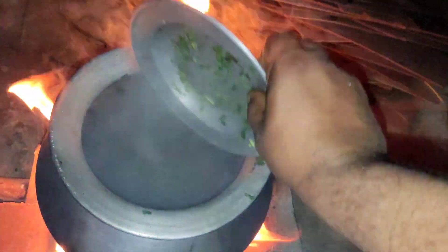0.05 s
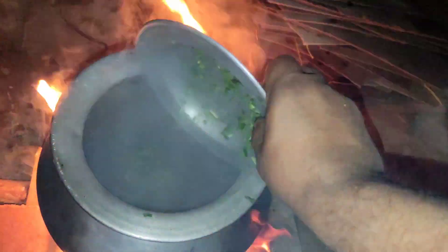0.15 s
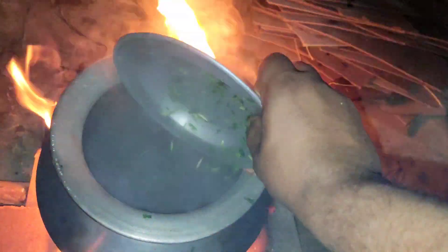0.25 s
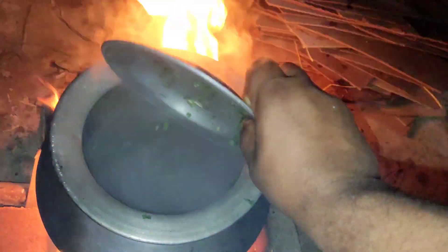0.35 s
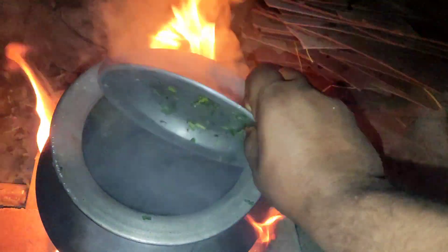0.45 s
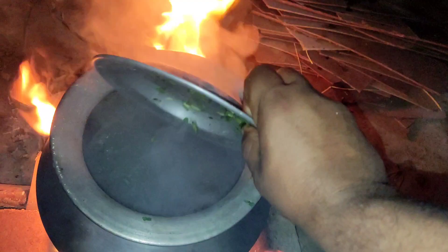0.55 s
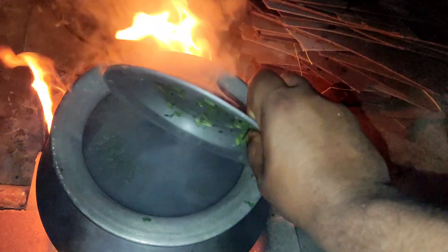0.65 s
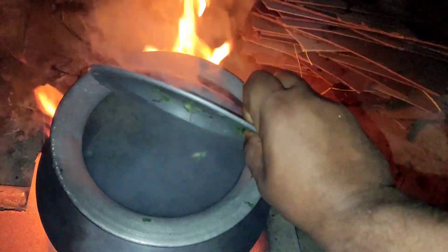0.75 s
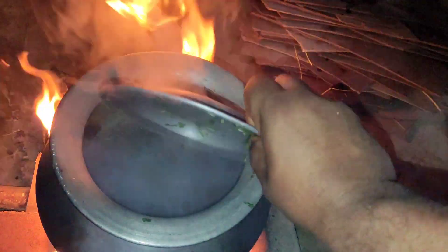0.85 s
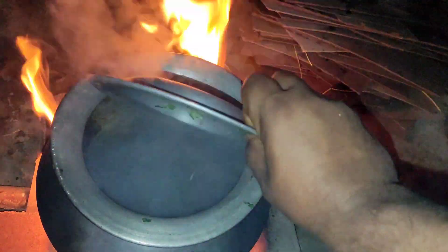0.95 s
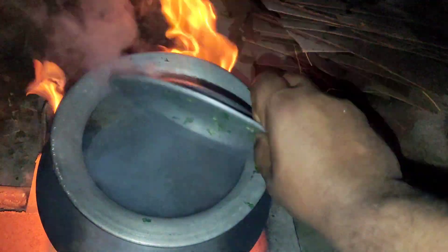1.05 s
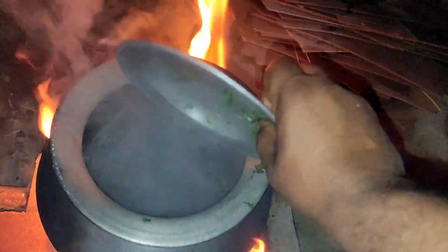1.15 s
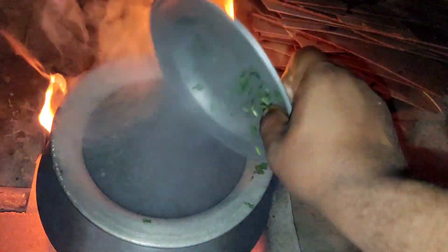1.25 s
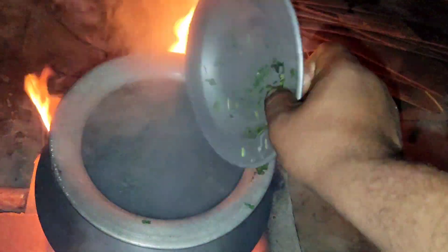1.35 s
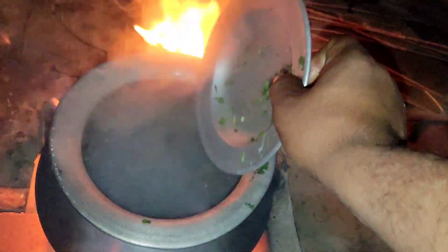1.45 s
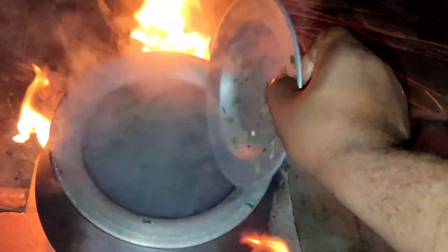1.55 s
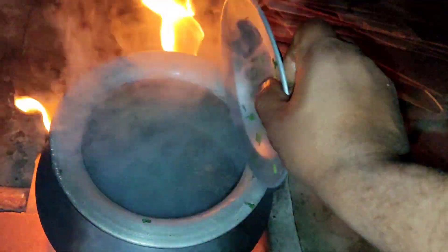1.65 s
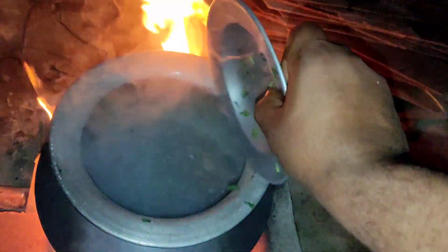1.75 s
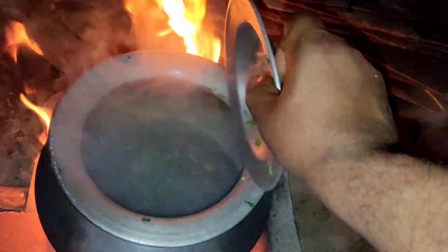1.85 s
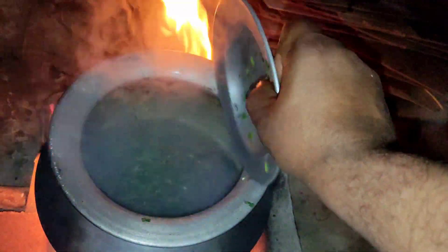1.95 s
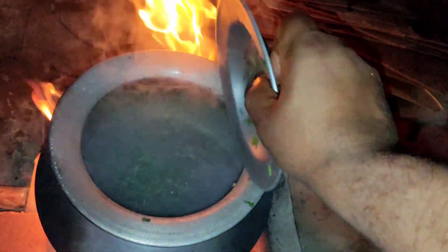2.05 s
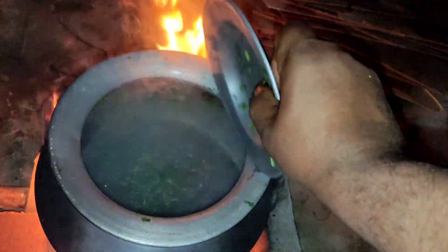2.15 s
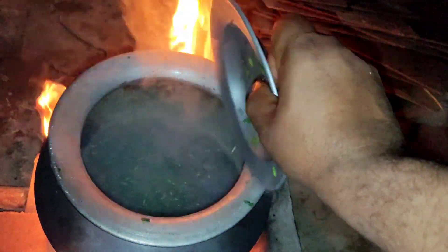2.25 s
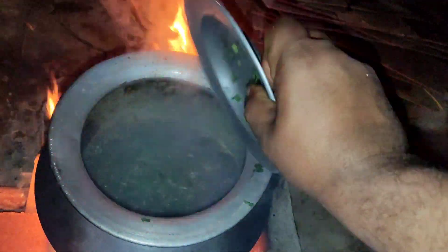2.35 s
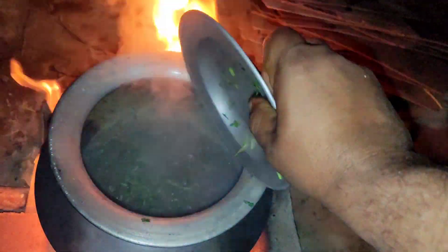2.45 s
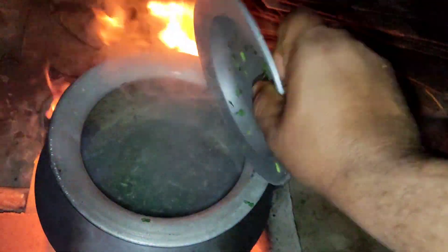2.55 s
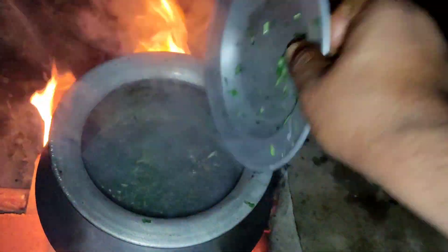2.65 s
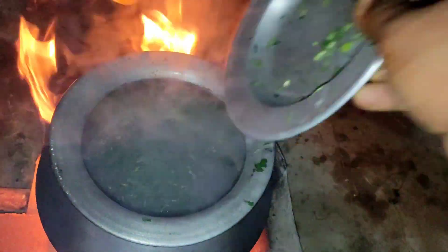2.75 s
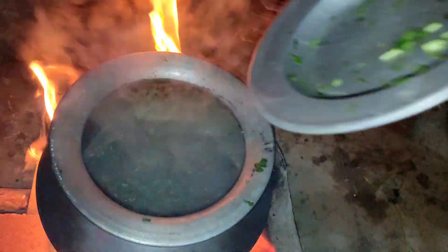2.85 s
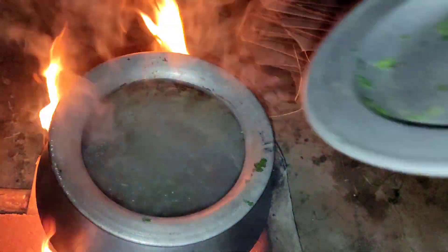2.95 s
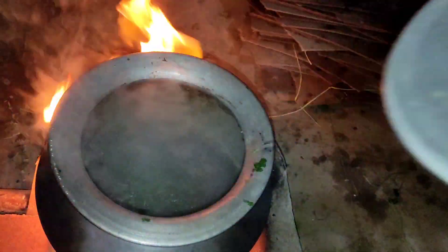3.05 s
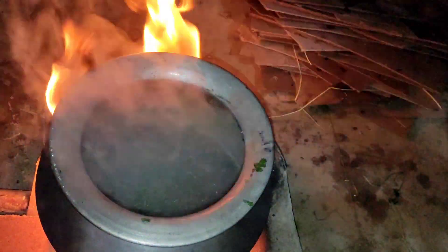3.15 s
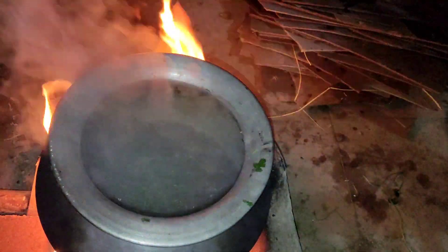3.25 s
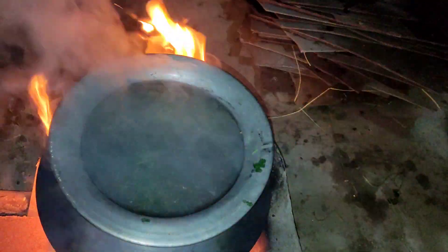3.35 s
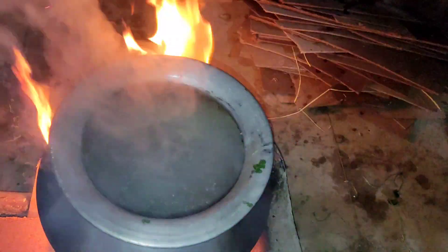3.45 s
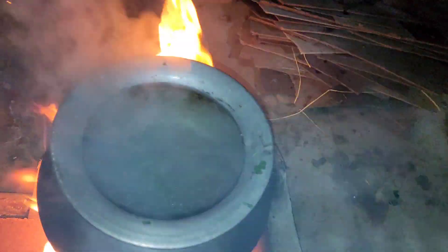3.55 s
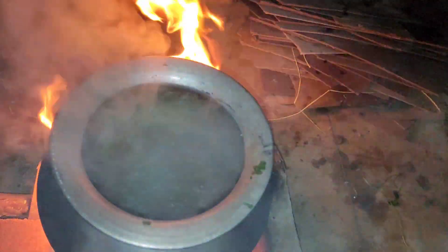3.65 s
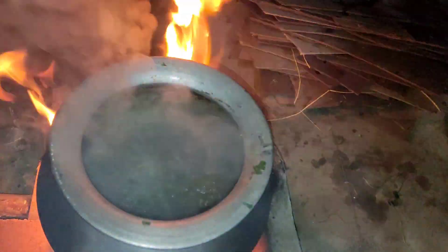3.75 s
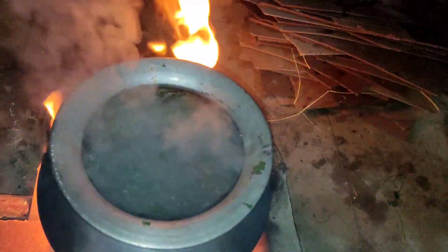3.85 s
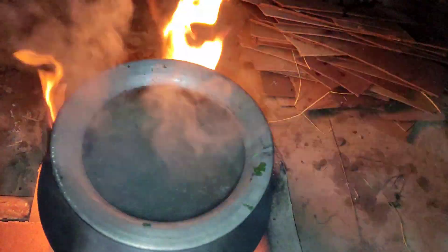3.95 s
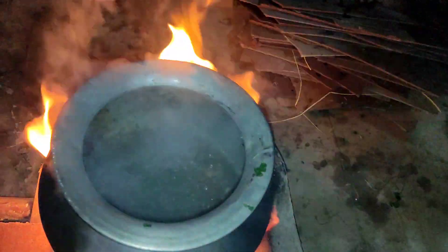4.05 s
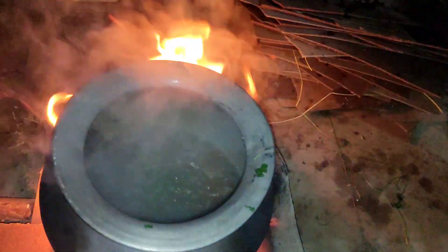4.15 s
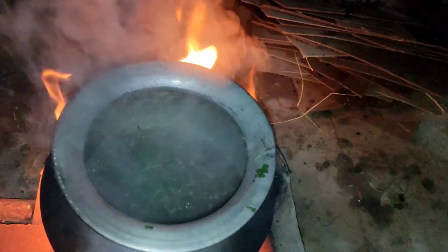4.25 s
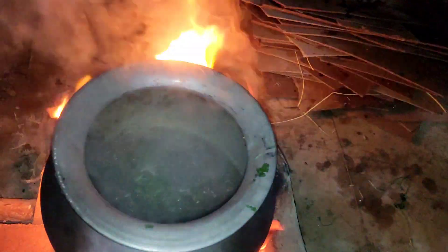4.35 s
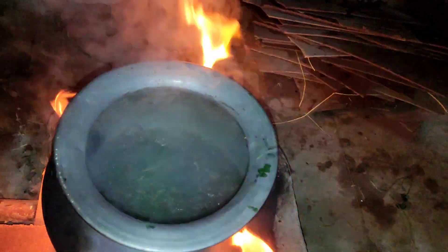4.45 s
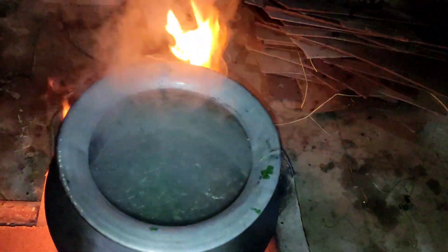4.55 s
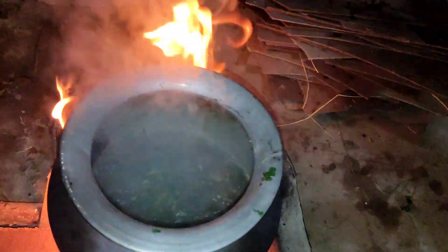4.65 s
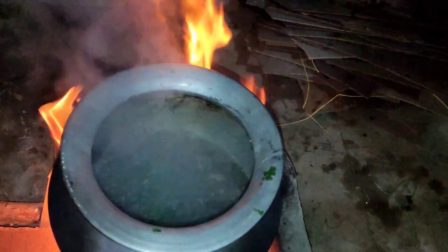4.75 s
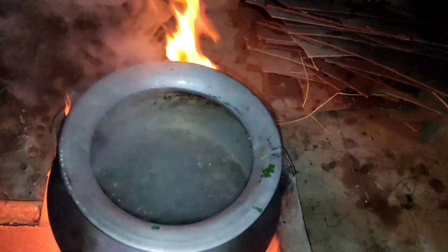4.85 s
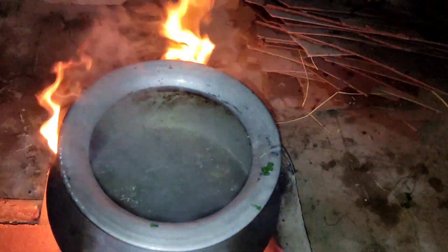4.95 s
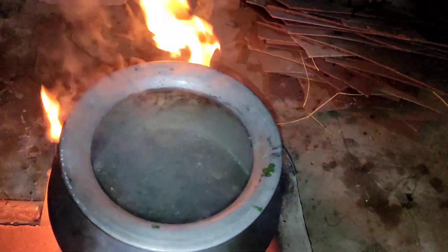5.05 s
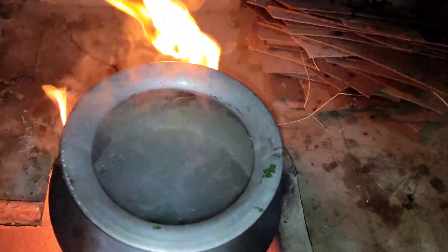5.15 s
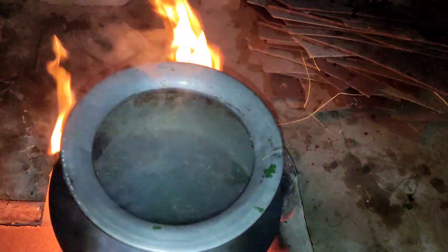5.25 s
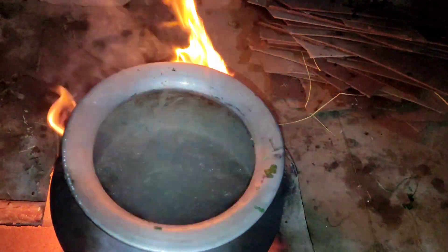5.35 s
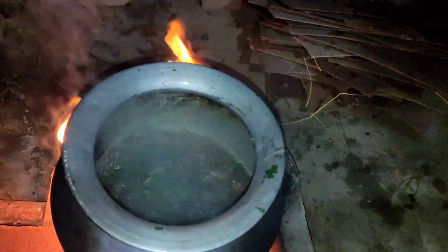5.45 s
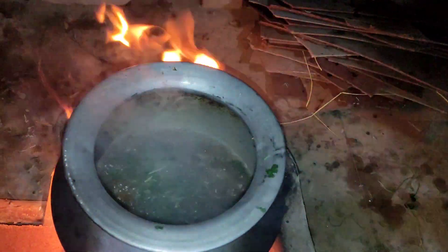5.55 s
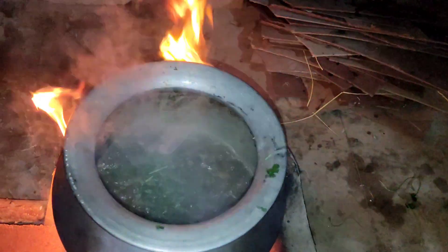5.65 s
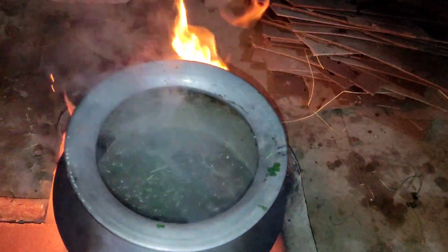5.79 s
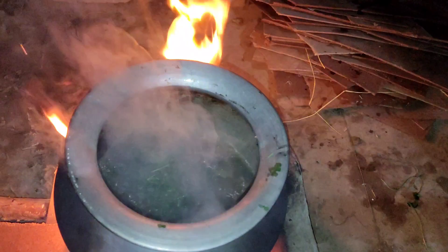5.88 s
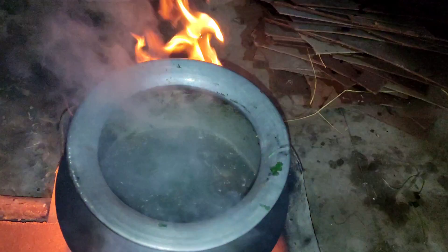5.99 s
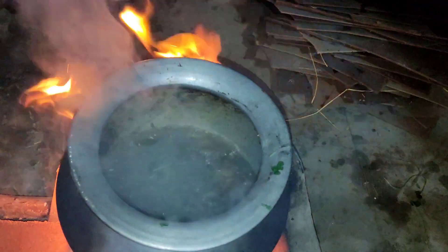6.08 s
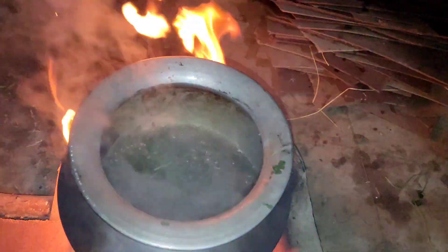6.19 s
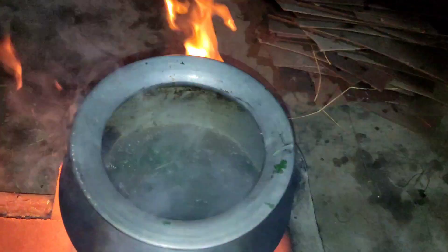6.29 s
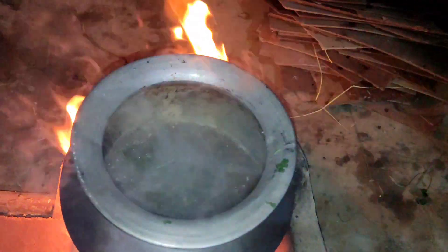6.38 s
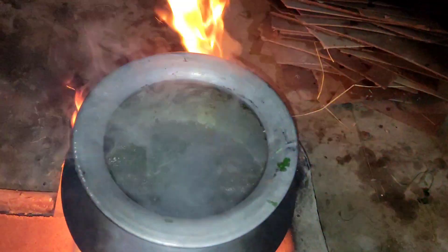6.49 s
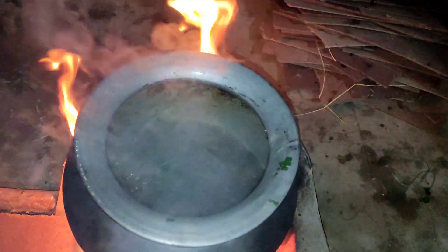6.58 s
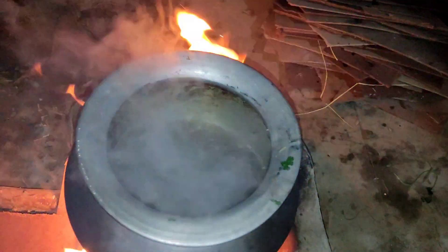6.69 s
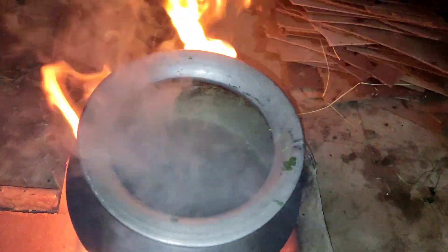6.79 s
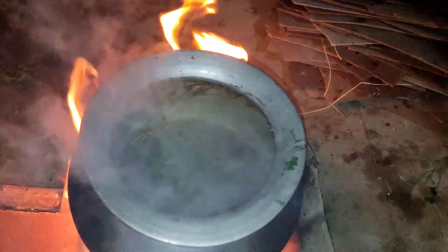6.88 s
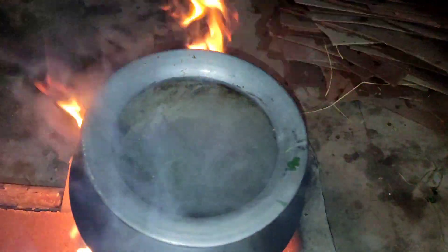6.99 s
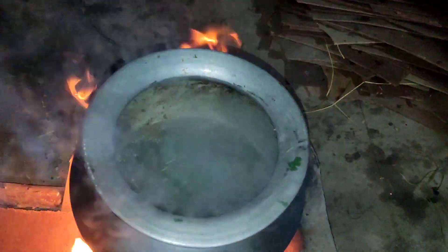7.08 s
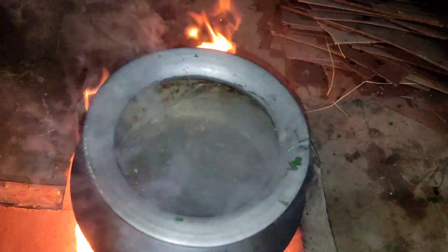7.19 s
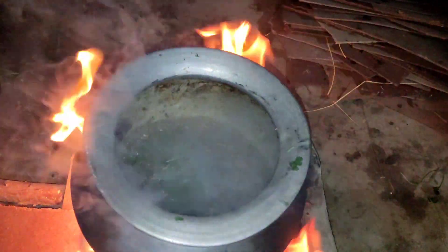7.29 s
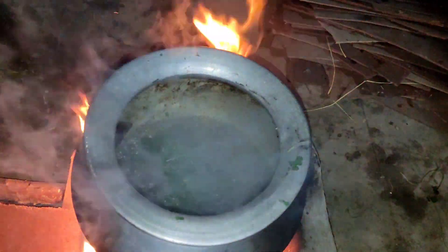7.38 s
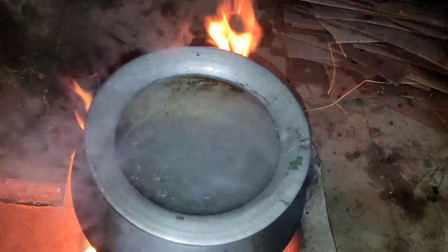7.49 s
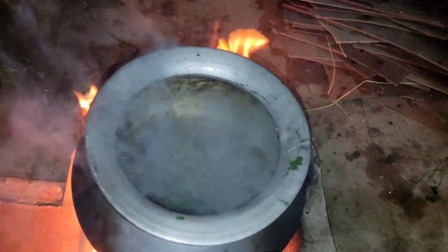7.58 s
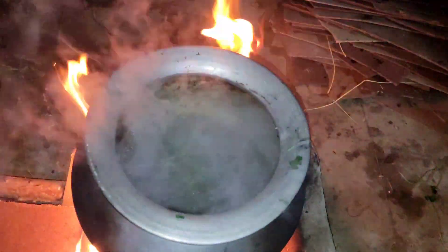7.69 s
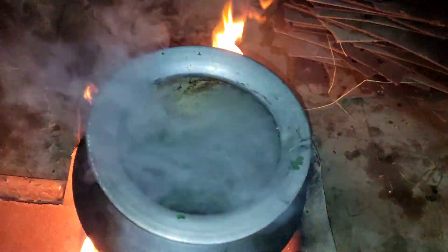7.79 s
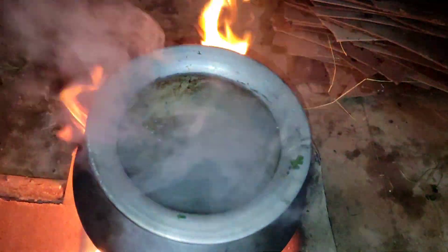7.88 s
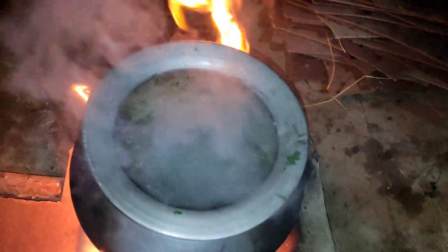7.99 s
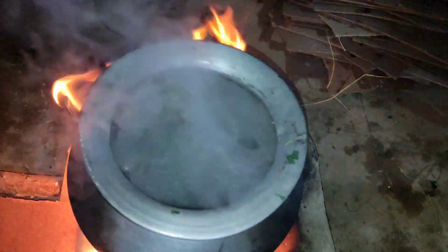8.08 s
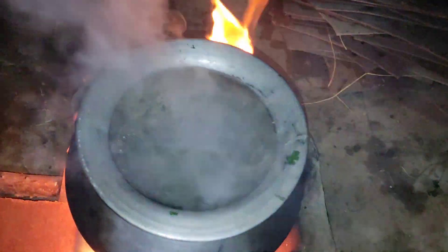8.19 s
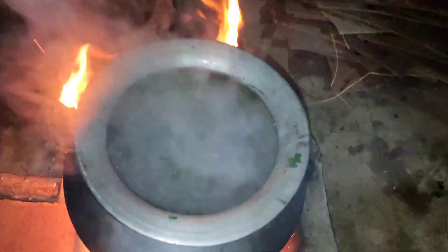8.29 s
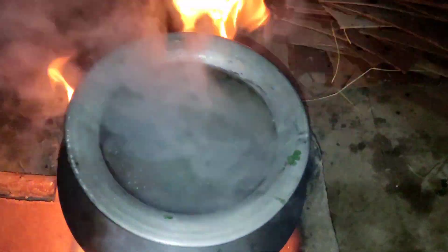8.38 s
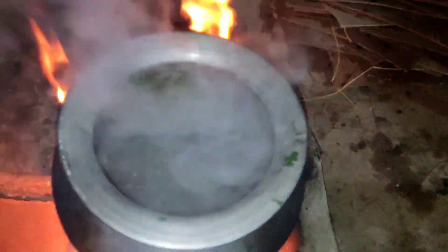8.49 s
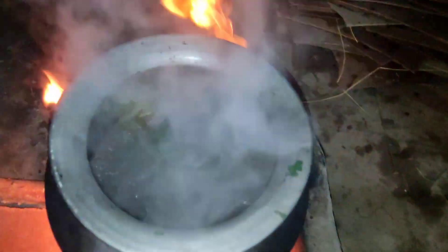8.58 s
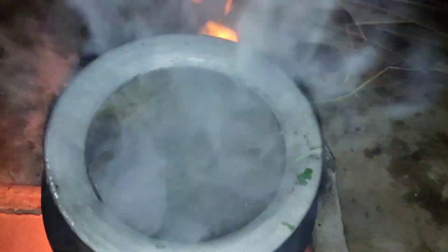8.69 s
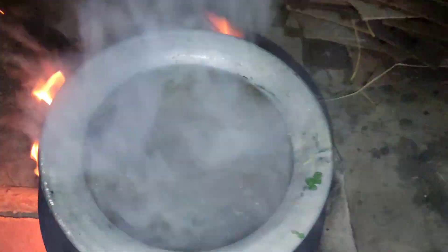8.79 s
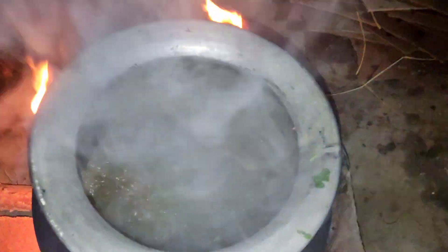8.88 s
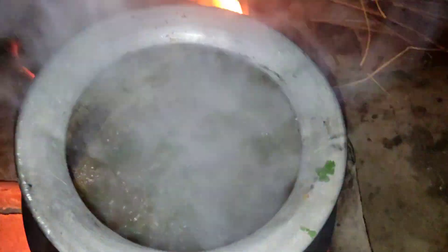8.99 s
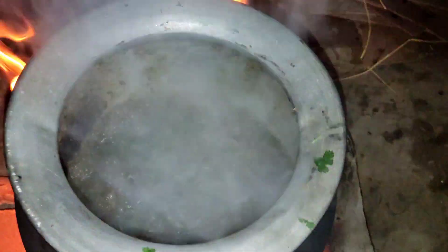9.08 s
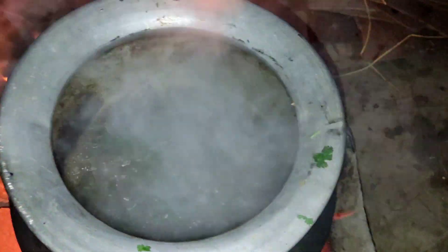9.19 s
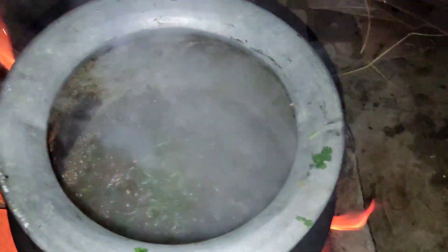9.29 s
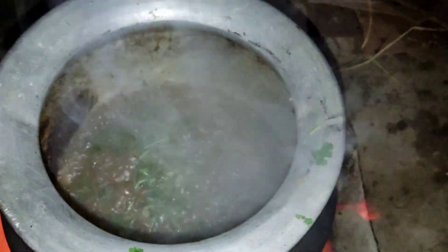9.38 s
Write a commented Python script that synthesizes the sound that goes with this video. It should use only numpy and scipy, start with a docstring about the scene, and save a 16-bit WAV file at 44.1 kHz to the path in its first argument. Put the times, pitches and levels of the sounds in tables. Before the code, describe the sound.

Close to a wide aluminium pot simmering on a wood fire, a lid is knocked on the rim nine times within the first two and a half seconds, with short metallic scrapes between. It rubs faintly as it is carried off. Bubbling, sizzle and fluttering flames continue with small snaps. A very loud wood pop cracks at about four and a half seconds; the simmer grows nearer at the end.

```python
"""Stew on a wood fire, lid at work

Stew bubbles and sizzles in a wide aluminium pot: chirped bubbles, fine clicks and shaped noise.
Flames rumble and crackle (noise, ticks, snaps); one loud pop makes the limiter duck.
A cook knocks the lid on the rim to shake off herbs, drags it and lifts it away: contact noise and modes."""
import sys
import numpy as np
from scipy import signal
from scipy.fft import rfft, irfft, next_fast_len
from scipy.io import wavfile
from scipy.ndimage import uniform_filter1d, minimum_filter1d, map_coordinates

SR = 44100
rng = np.random.default_rng(int(sys.argv[2]) if len(sys.argv) > 2 else 0)


def digitize_waveform(pressure):
    """Quantize a signal to 16-bit integers and store it at the path in sys.argv[1].

    Rows of a 2-D input are taken as channels; values are limited to [-1, 1].
    """
    field = np.atleast_2d(pressure).T
    bounded = np.clip(field, -1, 1)
    quanta = np.round(bounded * 32767).astype(np.int16)
    wavfile.write(sys.argv[1], SR, quanta)


N = 415863
BLOW_SAMPLES = 30000  # room for one blow or pop to die out

# flames: [f/Hz, level/dB per Hz]; flares: [peak t/s, half width/s, swell/dB]
FLAMES = [(10, 8.5), (25, -5), (50, -1), (80, -7), (110, -2), (160, -9), (300, -12.5), (1000, -61)]
FLARES = [(.39, 0.73, 7), (2.3, 1, 4.3), (5.3, 0.083, 7.1), (8.85, 0.38, 2.3)]
RUMBLE_DB = -52.5
# clearest snaps of the fire: [t/s, level/dB, brightest f/Hz]
SNAPS = [(0.195, -36, 7000), (0.884, -35.5, 8000), (2.765, -36, 6000), (3.108, -41, 7000),
         (3.243, -35, 4200), (3.708, -39.5, 6500), (3.899, -37, 10000), (5.11, -42, 8000),
         (6.1124, -44, 7000), (6.764, -43, 2800), (7.182, -37.5, 4000), (7.863, -40.5, 4500),
         (7.978, -33.5, 7140), (8.569, -48, 2800), (8.693, -37, 9000), (9.2478, -37, 8500)]
# loud pop of the firewood: [t/s, level/dB]
POP = (4.4178, 0)
# its crack; low thump of the overloaded microphone settling after it: [f/Hz, level/dB per Hz]
POP_COLOUR = [(60, -23), (300, -25.5), (800, -16), (1500, -12.5), (3000, -3), (4500, -3), (6000, 0.5),
              (8000, 3), (10000, 3), (13000, -2), (16000, -14)]
SETTLING_THUMP = [(20, 5), (120, -5), (250, -22), (1000, -58)]
# the pot's answer to the pop: [f/Hz, level/dB, t60/s]
POP_RING = [(657, -2.5, 0.33), (1012, -7, .28), (1206, -3, 0.28), (2143, -3, 0.55), (2945, -3.5, 0.3)]

# simmer swell; the camera leans in over the pot at the end: [t/s, swell/dB]
SIMMER_SWELL = [(0, 3), (1.7, 2), (2.2, 4.5), (2.8, 3.5), (3.4, 0), (4.25, -1.5), (4.75, 1.5), (6.1, -1.5),
                (7, 0.5), (8.4, 1), (9, 3), (9.43, 6)]
# how each part follows it: [resting level/dB, dB per dB of swell]
BUBBLING_LEVEL = (-48, 0.5)
SIZZLE_LEVEL = (-46, 0.53)
WASH_LEVEL = (-55.5, 0.92)
MOUTH_LEVEL = (-68.5, 2.66)
# churning murmur, fizz, wash of steam and flames: [f/Hz, level/dB per Hz]
BOIL = [(60, -50), (110, -2), (150, -13.5), (212, -17), (245, -5), (295, 2), (345, -2.5), (400, -6),
        (480, -16), (580, -13.5), (750, -23), (1200, -37), (3000, -43)]
SIZZLE = [(1000, -13), (3000, -14.5), (4200, -6.5), (5300, -9), (6500, -5.5), (7400, -2.5), (8100, -0.5),
          (9200, -2.5), (10800, -5), (12500, -8), (14500, -12), (16000, -22)]
WASH = [(200, 7.5), (600, -2), (940, -7), (1150, 6), (1600, -1), (1900, 10), (2200, 2.5), (2700, 11),
        (3400, 1.5), (6000, -20), (12000, -37)]
# standing waves in the pot's mouth: [f/Hz, level/dB, t60/s]
MOUTH_MODES = [(926, -1, 0.078), (1380, 4, 0.018), (1885, 5, 0.022), (2480, 3, 0.012)]
# clearest single bubbles: [t/s, level/dB, starting f/Hz]
PLOPS = [(5.226, -37.5, 1880), (6.841, -40, 1390)]
BURSTS_DB, PLIPS_DB = -8, -14  # thick and small bubbles within the bubbling
FIZZ_PATCHY_DB, WASH_PATCHY_DB = 1.5, 1.3

# lid sliding on the rim; lid rubbing in the hand as it is carried away:
# [t/s, length/s, level/dB, share of length spent swelling, taper (small = blunt), body/dB, body cutoff f/Hz]
DRAGS = [(0.297, 0.17, -51.5, 0.16, 0.81, 6.5, 5000), (1.249, 0.35, -36.5, 0.49, 0.62, -11.5, 1500),
         (1.877, 0.17, -37, 0.074, 0.76, 5.5, 12000)]
RUBS = [(2.668, 0.49, -50.5, 0.75, 0.63, -19, 3000), (2.89, 0.13, -53.5, 0.57, 1, 8, 2200)]
# hiss of the fine slips: [f/Hz, level/dB per Hz]
DRAG_HISS = [(500, -24), (1500, -13), (3000, -12), (5500, -4), (8000, -2), (11000, 1.5), (13500, -7.5),
             (16000, -18)]
# modes stirred by drag and rub: [f/Hz, level/dB, t60/s]
DRAG_MODES = [(301, 4, .09), (520, -9, .025), (700, -3, .035), (880, -6, .03), (1070, -2, .05),
              (1210, -6, .06), (1835, -1, .055), (2130, -5, .035), (2620, -7, .045), (2790, -4, .04),
              (3350, -1, .035), (3890, -4, .035), (4400, -5, .05), (4820, -1, .035), (5150, -4, .035),
              (5610, -3, .04), (5780, -3, .05), (6650, -6, .03)]
RUB_MODES = [(865, -2, .03), (1050, -2, .007), (2000, -4, .006), (2800, -1, .005), (3500, -4, .005)]
DRAG_WAVER = .006  # rms share of pitch wander

# lid on rim: [t/s, force/dB, air thump/dB, pot wall/dB, pot rim/dB, lid ring/dB, upper lid ring/dB,
# treble tilt/dB per octave, left-right of the ring/dB]
KNOCKS = [(0.2624, -3, 4.5, -2.5, 9, -8, -5.5, -2.5, 3), (0.5704, -4, 5, 6.5, -14, 0, -13, -2.5, 2.5),
          (0.775, 2.5, 5.5, 1, 8, -4, -1.5, -2, 7.5), (0.9694, 3, 1, -4.5, -2, -4.5, -6.5, -1, 5.5),
          (1.1713, 0, 2, -1, 4.5, -2, -0.5, -1.5, 8.5), (1.8745, -10, 3.5, 0, -12, -1, 3.5, -1.5, 3),
          (2.1385, -2, -7.5, -11, 15, -0.5, -7, -2.5, -3), (2.329, 5, -3, -11.5, 0, -7, -10.5, -1.5, 4),
          (2.564, 3, -1.5, -15, -1.5, -8, -5, -1, -0.5)]
# modes of the pot's air, wall and rim, the lid and its upper range: [f/Hz, level/dB, t60/s]
POT_AIR = [(244.4, 2.5, 0.091), (290.4, -2, 0.092), (373, -16.5, 0.062), (526, -17.5, 0.068)]
POT_WALL = [(640, -6, 0.09), (885, -10, .06), (975, -2.5, 0.07), (1062, 5, 0.085), (1086, 4, 0.08)]
POT_RIM = [(1815, 0, 0.1), (1840, -4, 0.12), (1905, -6, 0.08), (2110, -8, .07)]
LID = [(657, -11, .4), (1048, -10, .45), (1186, -1, .5), (1201, 0, .6), (1243, -1, .45), (1434, -1, .33),
       (1500, -6, .15), (1555, -4.5, .35), (1738, -13, .45), (2003, -1.5, .2), (2143, -7, .25)]
LID_UPPER = [(2594, -3.5, .24), (2630, -4, .12), (2756, 0, .11), (2805, -.5, .1), (3398, 4, .19),
             (3450, -1, .2), (3520, -3, .13), (3657, .5, .14), (3730, -3, .12), (3875, -1, .12),
             (4295, -2.5, .11), (4430, -3.5, .11), (4755, -7, .16), (5145, -2, .13), (5517, -4, .11),
             (6034, -4, .13), (6513, -3, .13), (6707, -2, .13)]
# crowded metal modes, contact of the edges: [f/Hz, level/dB per Hz]
CLANK = [(100, -11), (190, -4), (280, 3), (400, -1), (550, -2), (800, -6), (1150, -2), (1500, -2),
         (2100, -2), (2400, -6), (2800, -2), (3600, 0), (4500, -4), (5200, 1.5), (6200, -3), (8200, 2),
         (10000, 1), (13000, -6), (16000, -20)]
CONTACT = [(100, -4), (400, -4), (1500, -7), (3500, -5), (6000, -6), (8200, 2.5), (10500, -0.5),
           (13000, -5), (16000, -15)]
# decay of the clank: [f/Hz, t60/s]
CLANK_T60 = [(200, 0.23), (1200, 0.12), (4000, 0.16), (9000, 0.14), (15000, 0.19)]
CHATTER_S, CHATTER_SHARE = .003, .35  # further touches of a blow: latest delay, strength

# microphone ports: [f/Hz, likeness/1], [f/Hz, left-right/dB]
LIKENESS = [(30, 0.5), (130, .98), (300, .99), (640, 0.85), (1400, 0.2), (3000, 0), (16000, 0)]
PORTS = [(100, -0.5), (380, -0.5), (1200, 1.5), (2200, 0), (4400, 0), (6500, 0), (8200, -14), (9500, 2),
         (11000, 2.5), (13000, 10.5), (16000, -10)]
PORT_LAG_S = 0.00012  # left port behind right
EDGE_HZ = 16000
SIDES = np.array([[.5], [-.5]])  # half a difference to each port


def amp(db):
    """Decibels to gain."""
    return 10 ** (np.asarray(db) / 20)


def unit(x):
    """Scales to rms 1."""
    return x / np.sqrt(np.mean(x ** 2) + 1e-20)


def read(points, hz):
    """Reads a table on a log-frequency axis."""
    f, value = np.transpose(points)
    return np.interp(np.log(hz + 1), np.log(f + 1), value)


def add(mix, s, sound):
    """Mixes a stereo sound in at time s."""
    part = mix[:, max(round(s * SR), 0):][:, :sound.shape[1]]
    part += sound[:, :part.shape[1]]


def colour(x, spectrum, tilt_db=0):
    """Shapes two signals by a spectrum and correlates the ports by LIKENESS."""
    hz, z = np.fft.rfftfreq(x.shape[1], 1 / SR), rfft(x)
    same = np.clip(read(LIKENESS, hz), -1, 1)
    z[1] = same * z[0] + np.sqrt(1 - same ** 2) * z[1]
    octaves = np.log2(np.maximum(hz, 1000) / 4000)
    gain = amp(read(spectrum, hz) + tilt_db * octaves)
    return unit(irfft(z * gain, x.shape[1]))


def noise(size, spectrum, tilt_db=0):
    """Stereo noise with the given spectrum."""
    white = rng.standard_normal((2, next_fast_len(size, True)))
    return colour(white, spectrum, tilt_db)[:, :size]


def drift(hz):
    """Slow random wander of rms 1: 20 sines at rates up to hz."""
    t = np.linspace(0, N / SR, 2048)
    rates = np.geomspace(hz / 10, hz, 20)
    wander = np.sin(2 * np.pi * (rates[:, None] * t + rng.random((20, 1)))).sum(0)
    return np.interp(np.arange(N) / SR, t, unit(wander))


def clicks(size, per_s, spread_db):
    """Random clicks: many small, a few large."""
    sizes = amp(spread_db * np.minimum(rng.exponential(1, size), 2.5))
    signs = rng.choice([-1, 1], size)
    return sizes * signs * (rng.random(size) < per_s / SR)


def die_away(x, t60):
    """Lets each band of a sound decay at its own speed."""
    hz, t, z = signal.stft(x, SR, nperseg=256)
    decay = amp(-60 * t / read(t60, hz)[:, None])
    return signal.istft(z * decay, SR, nperseg=256)[1][:, :x.shape[1]]


def patchy(x, depth_db):
    """Brief patches of the spectrum swell and sink, as clusters of bubbles come and go."""
    z = signal.stft(x, SR, nperseg=512)[2]
    field = uniform_filter1d(rng.standard_normal(z.shape[1:]), size=12, axis=0)
    field = uniform_filter1d(field, size=4, axis=1)
    return signal.istft(z * amp(depth_db * unit(field)), SR, nperseg=512)[1][:, :N]


def ring(modes, t, scatter_db=3.5, rise=0.0017, sag=0, settle_s=.017):
    """Damped modes; pitch starts off by the share sag and settles; ports differ in phase by LIKENESS."""
    out = np.zeros((2, len(t)))
    bent = t + sag * settle_s * (1 - np.exp(-t / settle_s))
    for hz, db, t60 in modes:
        size, lag = rng.standard_normal(2)
        apart = np.arccos(np.clip(read(LIKENESS, hz), -1, 1)) * np.sign(lag) * SIDES
        start = 2 * np.pi * rng.random()
        decay = amp(db + scatter_db * size - 60 * t / t60)
        out += decay * np.sin(2 * np.pi * hz * bent + start + apart)
    return out * (1 - np.exp(-t / rise))


def stir(drive, modes):
    """A continuous drive keeps short modes sounding."""
    answer = ring(modes, np.arange(SR // 6) / SR, scatter_db=1)
    return unit(signal.oaconvolve(drive[None], answer, axes=1)[:, :len(drive)])


def fire():
    """Flames flutter low down and swell with each flare while the embers tick."""
    t = np.arange(SR // 20) / SR
    ticks = np.zeros((2, N))
    for hz in np.geomspace(1400, 6000, 8):
        shape = np.exp(-t / 0.001) + 1.2 * np.exp(-t / 0.011)
        tick = noise(len(t), [(hz / 3, -26), (hz, 0), (hz * 3, -22)]) * shape
        ticks += signal.oaconvolve(clicks(N, 6, 3)[None], tick, axes=1)[:, :N]
    time_s = np.arange(N) / SR
    flare_db = sum(db * np.exp(-((time_s - s) / half) ** 2) for s, half, db in FLARES)
    rumble = noise(N, FLAMES) * amp(RUMBLE_DB + flare_db + 1.0 * drift(10.0))
    return rumble + amp(-59.5) * unit(ticks)


def snap(db, hz):
    """A small crack of burning wood: a noise band round hz with a short tail."""
    t = np.arange(SR // 8) / SR
    shape = np.exp(-t / .0025) + .25 * np.exp(-t / .015)
    band = [(hz / 6, -22), (hz / 2, -7), (hz, 0), (hz * 2, -7), (hz * 6, -22)]
    return amp(db) * shape * noise(len(t), band)


def crackling():
    """The burning wood snaps now and then."""
    out = np.zeros((2, N))
    for s, db, hz in SNAPS:
        add(out, s, snap(db, hz))
    return out


def pop(db):
    """A pocket in the wood bursts: crack, scatter, faint pot ring; the overloaded microphone settles."""
    t = np.arange(BLOW_SAMPLES) / SR
    crack = amp(7.0) * noise(BLOW_SAMPLES, POP_COLOUR) * np.exp(-(t / 0.013) ** 4)
    scatter_t60 = [(300, 0.18), (3000, 0.14), (12000, 0.11)]
    scatter = amp(3) * die_away(noise(BLOW_SAMPLES, POP_COLOUR, tilt_db=-5.0), scatter_t60)
    pot = amp(-22.5) * ring(POP_RING, t, scatter_db=0)
    # a slow offset plus low noise
    settling = (amp(-17.0) + amp(-27.0) * noise(BLOW_SAMPLES, SETTLING_THUMP)) * np.exp(-t / 0.052)
    return amp(db) * (crack + scatter + pot + settling) * (1 - np.exp(-t / 0.0008))


def bubbling():
    """Thick bubbles, rising in pitch, burst over a murmur in the pot's hollow; small ones plip above."""
    t, bursts, plips = np.arange(SR // 10) / SR, np.zeros(N), np.zeros((2, N))
    for hz in np.geomspace(130, 900, 14):
        bubble = np.sin(2 * np.pi * hz * t * (1 + 1.88 * t)) * np.exp(-t * hz / 4)
        bursts += signal.oaconvolve(clicks(N, 4, 3.9), bubble)[:N]
    for hz in np.geomspace(450, 3800, 20):
        bubble = ring([(hz, 0, 20 / hz)], t * (1 + 3 * t), scatter_db=-1.0, rise=0.00016)
        bubble *= (hz / 1000) ** -.2
        plips += signal.oaconvolve(clicks(N, 6, 4.9)[None], bubble, axes=1)[:, :N]
    hollow = signal.butter(1, [250, 400], "bandpass", fs=SR, output="sos")
    thick = amp(BURSTS_DB) * unit(signal.sosfilt(hollow, bursts))
    murmur = amp(-2.5) * noise(N, BOIL) * amp(0.23 * drift(12))
    return thick + amp(PLIPS_DB) * unit(plips) + murmur


def sizzling():
    """Countless tiny bubbles fizz at the hot wall (patchy noise); a few spit louder (clicks)."""
    size = next_fast_len(N, True)
    spits = clicks(size, 350, 16.0)
    both_ports = np.array([spits, np.roll(spits, shift=7)])
    fizz = patchy(noise(N, SIZZLE), FIZZ_PATCHY_DB)
    return fizz + amp(-14.5) * colour(both_ports, SIZZLE, tilt_db=0.0)[:, :N]


def simmer():
    """Bubbling, sizzle, wash of steam and flames and hum of the pot's mouth share one swell."""
    swell_db = np.interp(np.arange(N) / SR, *np.transpose(SIMMER_SWELL))
    wash = patchy(noise(N, WASH), WASH_PATCHY_DB)
    mouth = stir(rng.standard_normal(N), MOUTH_MODES)
    parts = [(BUBBLING_LEVEL, bubbling()), (SIZZLE_LEVEL, sizzling()),
             (WASH_LEVEL, wash), (MOUTH_LEVEL, mouth)]
    surge_db = 1.26 * drift(3.6)  # small, uneven surges of the boil
    return sum(amp(db + follow * swell_db + surge_db) * sound for (db, follow), sound in parts)


def plop(db, hz):
    """One larger bubble opens at the surface with a short, slightly rising note."""
    t = np.arange(SR // 10) / SR
    note = np.sin(2 * np.pi * hz * t * (1 + 1.2 * t))
    note = note * np.exp(-t * hz / 9) * (1 - np.exp(-t / 0.00066))
    return amp(db) * np.array([note, note])


def drag(modes, length_s, db, swell, taper, body_db, bright_hz):
    """Fine slips hiss; coarser ones ring the metal, its pitch wavering as the contact point moves."""
    size = round(length_s * SR)
    peak = np.clip(swell, .02, .98)
    stroke = np.interp(np.linspace(0, 1, size), [0, peak, 1], [0, 1, 0]) ** abs(taper)
    fine = np.array([clicks(size, 5400, 4) for _ in range(2)])
    # a light touch stirs only the low modes
    softness = signal.butter(2, min(bright_hz, SR / 3), fs=SR, output="sos")
    coarse = signal.sosfilt(softness, clicks(size, 800, 2.5))
    place = np.cumsum(1 + DRAG_WAVER * drift(38.0)[:size])
    body = np.array([map_coordinates(port, [place], mode="mirror") for port in stir(coarse, modes)])
    return amp(db) * stroke * (colour(fine, DRAG_HISS) + amp(body_db) * body)


def chatter(x):
    """The edges touch several times in quick succession, giving each blow its own hollows and peaks."""
    delays = (rng.random(3) * CHATTER_S * SR).astype(int)
    sizes = CHATTER_SHARE * rng.choice([-1, 1], 3)
    again = np.zeros_like(x)
    for size, delay in zip(sizes, delays):
        again += size * np.pad(x, ((0, 0), (delay, 0)))[:, :x.shape[1]]
    return unit(x + again) * np.sqrt(np.mean(x ** 2))


def knock(upper, force_db, air_db, wall_db, rim_db, lid_db, upper_db, tilt_db, pan_db):
    """The edges chatter for milliseconds; the metal clanks and rings, and the air in the pot thumps."""
    t = np.arange(BLOW_SAMPLES) / SR
    contact = amp(-11.5) * noise(BLOW_SAMPLES, CONTACT, tilt_db) * np.exp(-(t / 0.0057) ** 4)
    # every blow shares its energy anew among the same upper modes
    real, imaginary = rng.standard_normal((2, 2, len(upper)))
    partials = irfft(upper * (real + 1j * imaginary))
    metal = amp(-28.0) * colour(partials, CLANK, tilt_db) * amp(-60 * t / 0.1)
    clank = amp(-17.5) * die_away(noise(BLOW_SAMPLES, CLANK, tilt_db), CLANK_T60)
    air = ring(POT_AIR, t, scatter_db=-1.0, rise=0.002, sag=0.51, settle_s=0.0137)
    wall = ring(POT_WALL, t, scatter_db=2.0, rise=0.0023, sag=-0.26, settle_s=0.003)
    rim = ring(POT_RIM, t, scatter_db=-7.5)
    lid = ring(LID, t, scatter_db=-1.0)
    lid_upper = ring(LID_UPPER, t, scatter_db=2.5, rise=0.0014)
    ringing = amp(air_db - 19.0) * air + amp(wall_db - 21.0) * wall + amp(rim_db - 31.5) * rim
    ringing += amp(lid_db - 32.0) * lid + amp(upper_db - 29.5) * lid_upper
    strike = chatter((contact + metal + clank) * (1 - np.exp(-t / 0.00045)))
    blow = strike + amp(pan_db * SIDES) * ringing
    # keeps the blows free of low thud below about 200 Hz
    highpass = signal.butter(4, 205, "highpass", fs=SR, output="sos")
    return amp(force_db) * signal.sosfilt(highpass, blow)


def scene():
    """The simmering pot and the fire, with the lid at work over them."""
    mix = fire() + simmer() + crackling()
    add(mix, POP[0], pop(POP[1]))
    for s, db, hz in PLOPS:
        add(mix, s, plop(db, hz))
    for strokes, modes in [(DRAGS, DRAG_MODES), (RUBS, RUB_MODES)]:
        for s, *stroke in strokes:
            add(mix, s, drag(modes, *stroke))
    bins_hz = np.fft.rfftfreq(BLOW_SAMPLES, 1 / SR)
    upper = (bins_hz > 4000) & (rng.random(len(bins_hz)) < .009)  # a metal mode every 160 Hz or so
    for s, *blow in KNOCKS:
        add(mix, s, knock(upper, *blow))
    return mix


def record(dry):
    """Port colour and lag, a limiter that holds its gain down about 90 ms, saturation, band limit."""
    size = next_fast_len(N, True)
    hz = np.fft.rfftfreq(size, 1 / SR)
    ports = amp(read(PORTS, hz) * SIDES) * np.exp(-2j * np.pi * hz * PORT_LAG_S * SIDES)
    x = irfft(rfft(dry, size) * ports, size)[:, :N]
    power = abs(uniform_filter1d((x ** 2).mean(0), size=220))
    power_db = 10 * np.log10(power + 1e-12)
    needed_db = np.minimum(-12.0 - power_db, 0)
    held_db = minimum_filter1d(needed_db, size=3960, origin=1890)  # window mostly in the past
    gain = amp(uniform_filter1d(held_db, size=40))
    limited = np.tanh(x * gain / 1.24) * 1.365
    lowpass = signal.firwin(255, EDGE_HZ, window=("kaiser", 9), fs=SR)
    return signal.oaconvolve(limited, lowpass[None], "same")


dry = scene()
out = record(dry)
digitize_waveform(out)
```